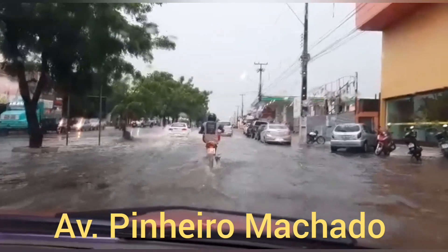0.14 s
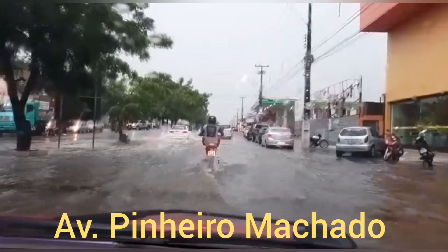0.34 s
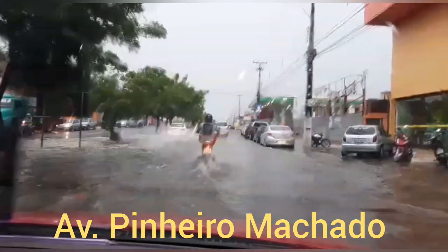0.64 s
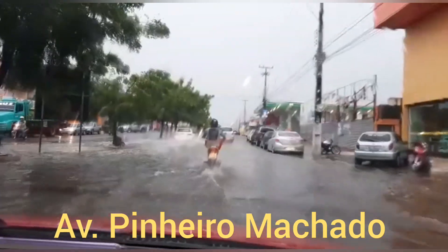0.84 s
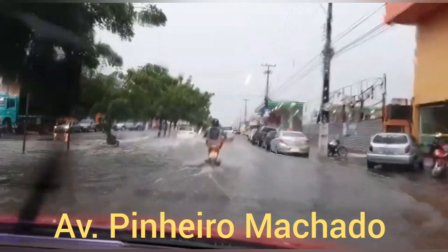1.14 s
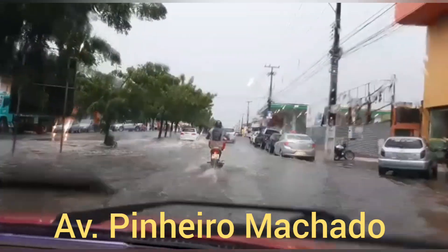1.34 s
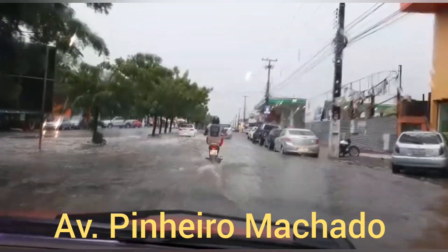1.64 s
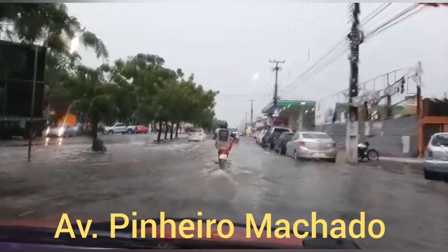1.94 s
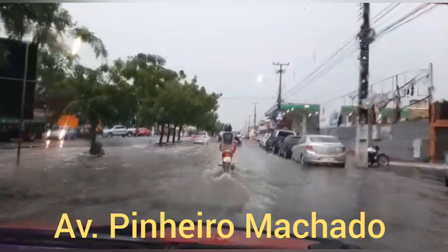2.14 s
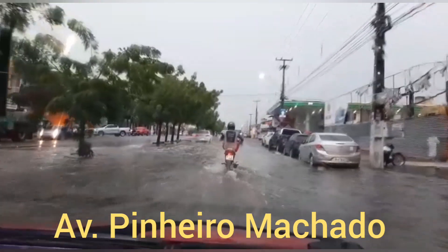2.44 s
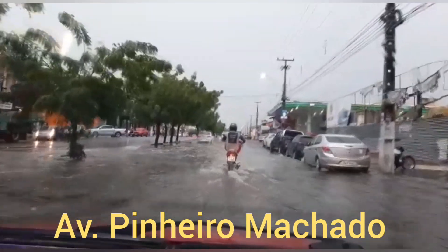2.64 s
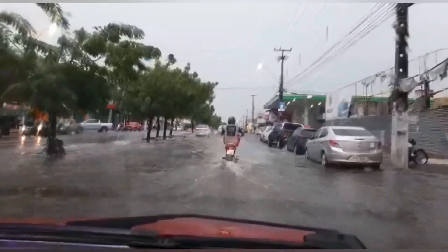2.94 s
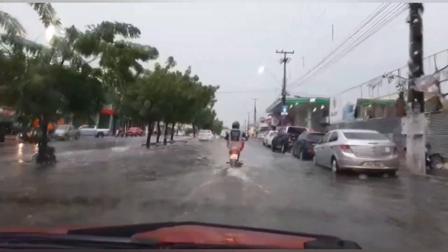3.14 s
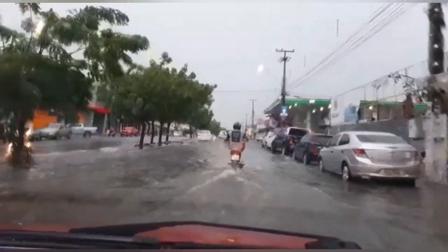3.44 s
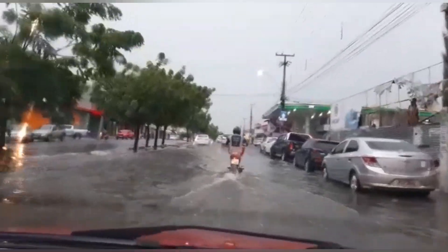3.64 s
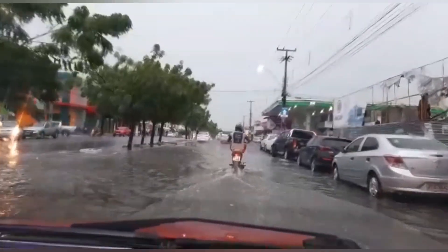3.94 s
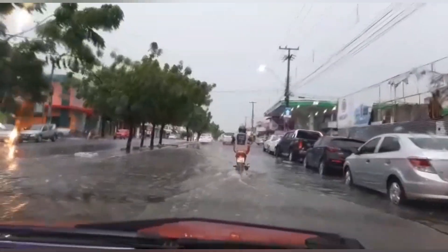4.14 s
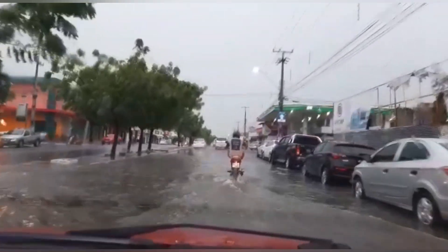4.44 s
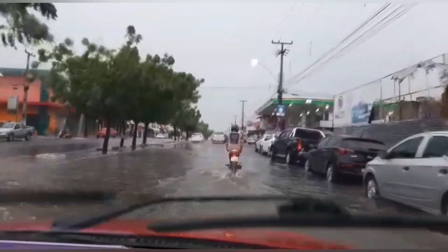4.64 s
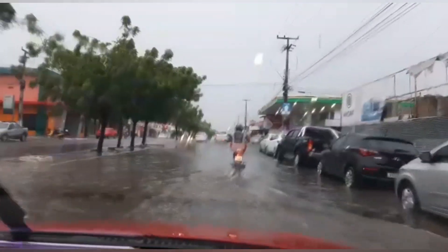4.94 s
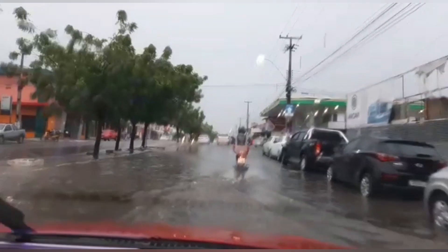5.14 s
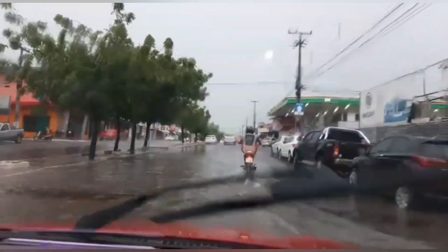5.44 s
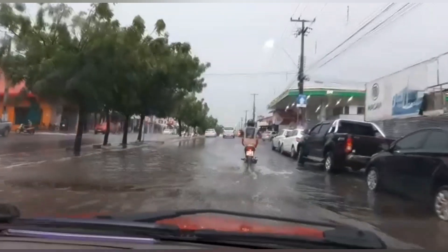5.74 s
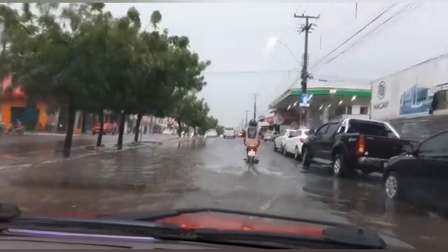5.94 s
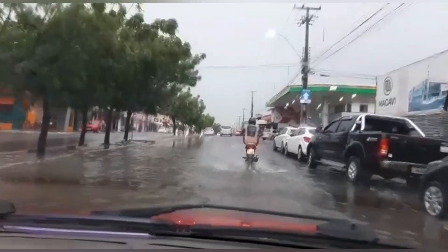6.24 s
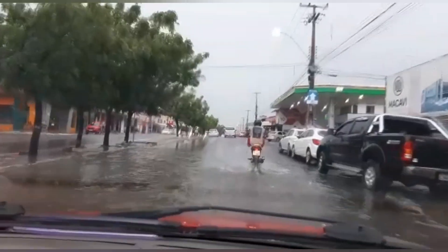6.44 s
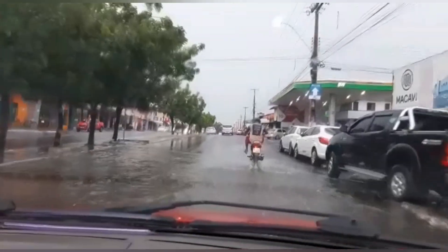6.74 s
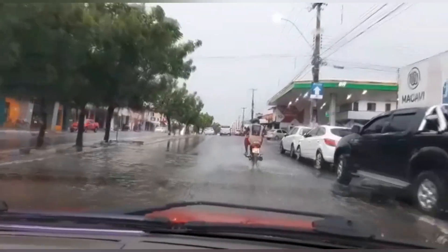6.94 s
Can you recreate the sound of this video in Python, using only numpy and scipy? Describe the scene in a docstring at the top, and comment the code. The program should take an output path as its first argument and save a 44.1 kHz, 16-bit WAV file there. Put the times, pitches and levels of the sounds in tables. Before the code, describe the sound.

Inside a car creeping along a flooded street, a deep tyre rumble and a low engine hum run for the whole seven seconds, swelling and sinking unevenly. Beneath them lies a faint wash of water with a fine fizz of rain. At about 0.35 seconds a relay ticks softly and the wipers swish up the wet windscreen with a low rubbery buzz, judder and knock dully near 0.9, then slide back quietly, with another tick at 1.5. Between 2.9 and 4.4 seconds a handful of light, sharp raindrops tap the glass. At 4.5 the relay ticks and the wipers sweep again, with a stronger thump at 5.0, a judder, a softer knock at 5.5 and a tick at 5.7. The rumble continues to the end as the rain fizz grows slightly brighter. Everything sounds close and enclosed.

```python
"""Inside a car creeping along a flooded street in the rain.
The engine hums and the tyres make the cabin boom; water washes under the car, rain patters on the glass.
Twice the wipers run: a relay ticks, the rubber sticks and slips up the wet windscreen with a swish and
a buzz, judders and knocks at the turn, then slides back quietly."""
import sys
import numpy as np
from scipy import signal
from scipy.fft import rfft, irfft
from scipy.io import wavfile
from scipy.ndimage import uniform_filter1d

SR = 44100
rng = np.random.default_rng(int(sys.argv[2]) if len(sys.argv) > 2 else 0)


def bounce(signal):
    """Save signal as a 16-bit WAV file at the path given by the first command-line argument."""
    frames = np.transpose(np.atleast_2d(signal))
    limited = np.clip(frames, -1, 1)
    pcm = np.round(limited * 32767).astype(np.int16)
    wavfile.write(sys.argv[1], SR, pcm)


N = 312228


# Wipes: start t/s, swish level/dB, buzz level/dB, thrum level/dB
WIPES = [(.352, -27.5, -32, -14.5), (4.538, -28.5, -30.5, -15.5)]
# Judders near the turn: t/s into the wipe, hold/s, relative level/dB
JUDDERS = [(0.439, 0.014, -2.5), (0.522, 0.036, 1.5)]
# Rubber buzz: multiple of slip rate, relative level/dB
BUZZ_ORDERS = [(2, 3), (3, -1.5), (4, -8), (5, -14.5), (6, -18.5), (7, -12.5), (8, -30), (9, -15),
               (10, -20.5), (11, -21)]
# Windscreen thrum: multiple of slip rate, relative level/dB
THRUM_ORDERS = [(1, -1.5), (2, -12), (3, -18.5)]

def wipers(slip_hz=117, min_slip_hz=88.5, brake_s=.495, sag_hz_per_s=155, jitter=.012):
    """Stick-slip of the rubber drives swish, buzz and thrum; it slows as the arms brake for the turn."""
    out = np.zeros((2, N))
    t = np.arange(round(1.2 * SR)) / SR
    rate_hz = np.maximum(slip_hz - sag_hz_per_s * np.maximum(t - brake_s, 0), min_slip_hz)
    grip = envelope(t, start_s=.1, attack_s=.24, hold_s=.2, t60_s=.15)
    judder = sum(gain_of(db) * envelope(t, start_s, attack_s=.025, hold_s=hold_s, t60_s=.23)
                 for start_s, hold_s, db in JUDDERS)
    for start_s, swish_db, buzz_db, thrum_db in WIPES:
        cycles = np.cumsum(rate_hz * (1 + jitter * waver(len(t), rate_hz=29.1))) / SR
        buzz_pair = [harmonics(cycles, BUZZ_ORDERS, flutter=.39, flutter_hz=18) for _ in range(2)]
        buzz = cabin_field(np.array(buzz_pair))
        thrum = harmonics(cycles, THRUM_ORDERS, flutter=.36, flutter_hz=55) * gain_of([[1], [-1]])
        add(out, start_s, gain_of(swish_db) * swish(cycles))
        add(out, start_s, gain_of(buzz_db) * grip * buzz + gain_of(thrum_db) * judder * thrum)
    return out


# Rubber on wet glass: f/Hz, relative level/dB
SWISH_SPECTRUM = [(120, -26), (190, 0.5), (250, 7), (360, 0.5), (440, -5.5), (540, -3.5), (640, -8.5),
                  (830, -8.5), (1200, -18.5), (1600, -17), (2800, -23.5), (4000, -32), (6200, -34.5),
                  (9500, -45.5), (15500, -58.5)]
# Blade phases (break loose, catch, meet water, throw it aside, sweep, scrape, brake, slide back):
# t/s into the wipe, hold/s, relative level/dB, tilt/(dB/octave)
RUBS = [ (.05, .03, -3, -6), (.145, .02, -2, -4), (0.258, .03, -4.5, -0.5), (0.28, .06, -11, 1.46),
        (.34, .07, -11.5, 1.5), (0.418, .06, 0, -1), (.5, .05, -1, -1.5), (.68, .45, -24.5, 1.1), ]

def swish(cycles, attack_s=.013, t60_s=.12):
    """The rubber edge squeezes water over the glass: a spurt per slip, plus a crackle of beads."""
    length = len(cycles)
    spurts = .7 + np.exp(-(cycles % 1) / .25)
    rub = churn(colour(spurts * rng.standard_normal((2, length)), SWISH_SPECTRUM), depth_db=1)
    bead_spectrum = [(500, -23), (2000, 4.5), (6500, -9), (10000, -15), (15500, -22)]
    beads = colour(patter(length, per_s=650, spread_db=2.5), bead_spectrum)
    hz, t, bins = signal.stft(rub + gain_of(-27.5) * beads, SR, nperseg=512)
    octaves = np.log2(np.maximum(hz, 300) / 600)[:, None]
    power = sum((envelope(t, start_s, attack_s, hold_s, t60_s) * gain_of(db + tilt * octaves)) ** 2
                for start_s, hold_s, db, tilt in RUBS)
    return cabin_field(signal.istft(bins * np.sqrt(power), SR, nperseg=512)[1])


# Blade flops: t/s, level/dB, hardness/(dB/octave)
KNOCKS = [(.645, -31, 20), (0.909, -17, -3), (4.985, -26, 20), (5.016, -11.5, -2), (5.535, -19, -7)]
# Windscreen modes: f/Hz, relative level/dB, t60/s
WINDSCREEN_MODES = [(185, -8, .08), (245, -3, .07), (290, 0, .07), (370, -3, .05), (600, -13, .04)]

def blade_knocks(rise_s=.003):
    """Rubber blows ring the windscreen; harder ones favour the upper modes."""
    out = np.zeros((2, N))
    t = np.arange(8192) / SR
    for start_s, db, hardness in KNOCKS:
        ring = np.zeros(len(t))
        for hz, mode_db, t60_s in WINDSCREEN_MODES:
            decay = gain_of(mode_db + hardness * np.log2(hz / 290) - 60 * t / t60_s)
            ring += decay * np.sin(2 * np.pi * (hz * t + rng.random()))
        add(out, start_s, gain_of(db) * (1 - np.exp(-t / rise_s)) * ring)
    return out


# Engine boom: t/s, level/dB
ENGINE_LEVEL = [(0, -37), (0.3, -26.5), (0.52, -30.1), (0.77, -17.5), (1.1, -34), (1.5, -24), (1.87, -28.5),
                (2.3, -22.5), (2.6, -31), (3.05, -18.5), (3.32, -28.9), (3.8, -21), (4.1, -25.5),
                (4.55, -20.6), (5.4, -27), (5.62, -20.9), (6.5, -36), (7.05, -20)]
# Engine orders: multiple of firing rate, relative level/dB
ENGINE_ORDERS = [(1, -3.5), (2, -13.5), (3, -21.5)]

def engine(firing_hz=55.6, drift_hz=.904):
    """Four cylinders at steady low revs excite a cabin boom that swells and sinks with the load."""
    level_db, = follow(ENGINE_LEVEL)
    cycles = np.cumsum(firing_hz + drift_hz * waver(N, rate_hz=3.56)) / SR
    hum = harmonics(cycles, ENGINE_ORDERS, flutter=.46, flutter_hz=9.3)
    return hum * gain_of(level_db) * gain_of([[1.7], [-2.3]])


# Tyre rumble in the cabin: f/Hz, relative level/dB
RUMBLE_SPECTRUM = [(15, -40), (28, -29), (42, -3), (52, -3), (74, -2), (95, 1.5), (112, -3.5), (129, 0.5),
                   (145, -4), (175, -6), (204, -13.5), (265, -10), (310, -15), (360, -21), (490, -23),
                   (900, -37), (1400, -74.5)]
# Road shake: t/s, level/dB
ROAD_LEVEL = [(0, -21.5), (.45, -19), (1.15, -25), (1.55, -23), (1.9, -24.5), (2.35, -19), (3.1, -22.5),
              (3.3, -23), (3.85, -22), (4.3, -22), (4.62, -19), (5.35, -23), (5.6, -23.5), (6.2, -24),
              (7.08, -19)]

def tyre_rumble(split_hz=180):
    """The road shakes the body; the deep boom follows the bumps more than the drone above it."""
    road_db, = follow(ROAD_LEVEL)
    noise = cabin_field(colour(rng.standard_normal((2, N)), RUMBLE_SPECTRUM))
    boom = signal.sosfiltfilt(signal.butter(3, split_hz, fs=SR, output="sos"), noise)
    drone = noise - boom
    boom_rms = np.sqrt(uniform_filter1d((boom ** 2).mean(0), size=12000) + 1e-9)
    drone_db = -22 + .34 * (road_db - road_db.mean())
    return boom / boom_rms * gain_of(road_db) + drone * gain_of(drone_db)


# Water and rain through the glass: f/Hz, relative level/dB
WASH_SPECTRUM = [(350, -14), (630, -1.5), (740, -14), (880, -14), (975, -5.5), (1210, -14), (1480, -11.5),
                 (2800, -18.5), (3130, -22.5), (4100, -22.5), (7000, -35), (8800, -36.5), (12800, -43.5),
                 (13500, -49), (15700, -44.5)]
# Water thrown up: t/s, wash offset/dB, fizz offset/dB
SPRAY = [(0, 1, 0), (1.05, -2, -4), (1.5, -1, -2), (2.0, -1.3, -.5), (2.55, 1, 1.5), (3.6, -1, 1),
         (4.3, 2.1, 0.5), (5.3, -0.5, 1), (6.2, 0, 1), (6.7, -1, 4), (7.08, 1.5, 5)]

def water_wash(base_db=-45, fizz_hz=5500):
    """Water churned by the tyres, with the fizz of fine rain on top."""
    wash_db, fizz_db = follow(SPRAY)
    grains = rng.standard_normal((2, N)) + gain_of(-6) * patter(N, per_s=2500, spread_db=1.5)
    water = cabin_field(churn(colour(grains, WASH_SPECTRUM), depth_db=1.14))
    fizz = signal.sosfiltfilt(signal.butter(1, fizz_hz, "high", fs=SR, output="sos"), water)
    return (water - fizz) * gain_of(base_db + wash_db) + fizz * gain_of(base_db + fizz_db)


# Relay ticks: t/s, level/dB
RELAY_TICKS = [(.349, -42), (1.544, -43.5), (4.534, -42.5), (5.739, -42.5)]
# Tick spectrum: f/Hz, relative level/dB
RELAY_SPECTRUM = [(2500, -23), (4000, 0), (7500, -5), (10000, -6), (11800, -2), (13000, -3), (13900, -11),
                  (15500, -21)]

def relay():
    """The wiper relay closes and opens behind the dashboard."""
    out = np.zeros((2, N))
    for start_s, db in RELAY_TICKS:
        tick = click(RELAY_SPECTRUM, rise_s=.0069, t60_s=.051, tail_db=-11, tail_t60_s=.1)
        add(out, start_s, gain_of(db) * tick)
    return out


# Big drops: t/s, relative level/dB, ring f/Hz
DROPS = [(2.865, -49, 4784), (3.583, -49, 6600), (3.771, -48, 7810), (3.804, -42.5, 5900),
         (3.985, -50, 11500), (4.213, -49, 9310), (4.413, -38, 6000)]
# Struck glass: f/Hz, relative level/dB
GLASS_SPECTRUM = [(1200, -12), (2500, 12.5), (4200, -2), (7300, -2), (8500, -8), (11500, -11), (15500, -22)]

def raindrops():
    """Each big drop smacks the glass and rings briefly at a pitch set by its size."""
    out = np.zeros((2, N))
    for start_s, db, ring_hz in DROPS:
        smack = click(GLASS_SPECTRUM, rise_s=.0004, t60_s=.012, tail_db=-18, tail_t60_s=.07)
        drive = click(GLASS_SPECTRUM, rise_s=.0004, t60_s=.015, tail_db=-8, tail_t60_s=.09)
        ring = signal.lfilter(*signal.iirpeak(ring_hz, Q=6, fs=SR), drive)
        add(out, start_s, gain_of(db) * (2.2 * smack + 2.6 * ring) * gain_of([[.8], [-.8]]))
    return out


# Left-right likeness: f/Hz, correlation
CORRELATION = [(50, 0.53), (130, 0.85), (290, 0.78), (640, 0.38), (1300, -0.26), (3000, .03), (15000, 0)]
# Balance: f/Hz, left minus right level/dB
BALANCE = [(50, 6), (110, 3), (200, 1.5), (290, -0.5), (450, 4), (620, -2.8), (780, 3.5), (1050, 0.5),
           (1600, -1), (2600, -1.6), (4400, 0.5), (8000, -0.1), (15000, 0)]

def cabin_field(pair):
    """Two unrelated signals become one field: bass mostly shared and leaning left, treble diffuse."""
    hz = np.fft.rfftfreq(pair.shape[-1], 1 / SR)
    mid, side = rfft(pair)
    correlation = np.clip(at_hz(CORRELATION, hz), -.9, 1)
    side = side * np.sqrt((1 - correlation) / (1 + correlation))
    lean = gain_of(at_hz(BALANCE, hz) / 2)
    return irfft(np.array([(mid + side) * lean, (mid - side) / lean]), pair.shape[-1])


def reflections(x, per_s=1500, gap_s=.002, t60_s=.1, wet_db=-15):
    """Glass and dashboard throw the sound back within milliseconds, rippling all above the bass."""
    t = np.arange(3000) / SR
    taps = rng.standard_normal((2, len(t))) * (rng.random((2, len(t))) < per_s / SR)
    taps *= (t > gap_s) * gain_of(-60 * t / t60_s)
    taps /= np.linalg.norm(taps, axis=1, keepdims=True)
    taps = signal.sosfilt(signal.butter(2, 300, "high", fs=SR, output="sos"), taps)
    return x + gain_of(wet_db) * signal.oaconvolve(x, taps, axes=1)[:, :N]


def click(spectrum, rise_s, t60_s, tail_db, tail_t60_s):
    """Noise burst with a brief cabin tail."""
    t = np.arange(4096) / SR
    decay = gain_of(-60 * t / t60_s) + gain_of(tail_db - 60 * t / tail_t60_s)
    return (1 - np.exp(-t / rise_s)) * decay * colour(rng.standard_normal((2, len(t))), spectrum)


def patter(length, per_s, spread_db):
    """Random impacts of unequal size, one train per side, rms 1."""
    size = gain_of(spread_db * np.minimum(rng.exponential(1, (2, length)), 5))
    sign = rng.choice([-1, 1], (2, length))
    hits = rng.random((2, length)) < per_s / SR
    return unit_rms(size * sign * hits)


def churn(x, depth_db):
    """Splashes come and go in patches of time and pitch."""
    bins = signal.stft(x, nperseg=512)[2]
    patches = uniform_filter1d(rng.standard_normal(bins.shape[1:]), size=9, axis=0)
    patches = unit_rms(uniform_filter1d(patches, size=12, axis=1))
    return signal.istft(bins * gain_of(depth_db * patches), nperseg=512)[1][:, :x.shape[-1]]


def harmonics(cycles, orders, flutter, flutter_hz):
    """Harmonics of one cycle, each wavering in strength, rms 1."""
    tone = np.zeros(len(cycles))
    for order, db in orders:
        strength = gain_of(db) * (1 + flutter * waver(len(cycles), flutter_hz))
        tone += strength * np.sin(2 * np.pi * (order * cycles + rng.random()))
    return unit_rms(tone)


def waver(length, rate_hz):
    """Random drift up to about rate_hz, rms 1."""
    hz = np.fft.rfftfreq(length, 1 / SR)
    return unit_rms(irfft(rfft(rng.standard_normal(length)) / (1 + (hz / rate_hz) ** 4), length))


def envelope(t, start_s, attack_s, hold_s, t60_s):
    """Linear rise, hold, exponential decay."""
    decay_s = np.maximum(t - start_s - attack_s - hold_s, 0)
    return np.clip((t - start_s) / attack_s, 0, 1) * gain_of(-60 * decay_s / t60_s)


def colour(x, spectrum):
    """Filter by a spectrum, to rms 1."""
    hz = np.fft.rfftfreq(x.shape[-1], 1 / SR)
    return unit_rms(irfft(rfft(x) * gain_of(at_hz(spectrum, hz)), x.shape[-1]))


def at_hz(points, hz):
    """Interpolate on a log-frequency axis."""
    knots_hz, values = np.transpose(points)
    return np.interp(np.log(hz + 1), np.log(knots_hz + 1), values)


def follow(rows):
    """Interpolate each column of a time curve over the scene."""
    knots_s, *columns = np.transpose(rows)
    return [np.interp(np.arange(N) / SR, knots_s, column) for column in columns]


def add(mix, start_s, sound):
    """Mix a stereo sound in at start_s."""
    part = mix[:, max(round(start_s * SR), 0):][:, :sound.shape[-1]]
    part += sound[..., :part.shape[-1]]


def gain_of(db):
    """Decibels to gain."""
    return 10 ** (np.asarray(db) / 20)


def unit_rms(x):
    """Scale to rms 1."""
    return x / np.sqrt(np.mean(x ** 2) + 1e-20)


def scene():
    """Engine, road, water, wipers and drops, all inside the cabin."""
    driving = engine() + tyre_rumble() + water_wash()
    return reflections(driving + wipers() + blade_knocks() + relay() + raindrops())


def record(dry):
    """Brief fade at both ends, low-pass at 15.8 kHz."""
    faded = dry * signal.windows.tukey(N, .001)
    lowpass = signal.firwin(511, 15800, window=("kaiser", 9), fs=SR)
    return signal.oaconvolve(faded, lowpass[None], "same")


dry = scene()
out = record(dry)
bounce(out)
```